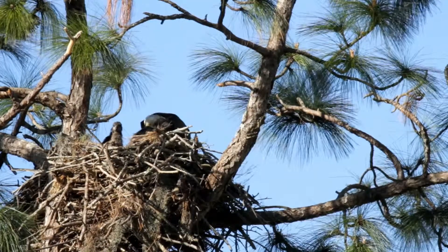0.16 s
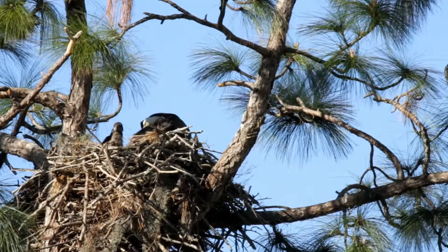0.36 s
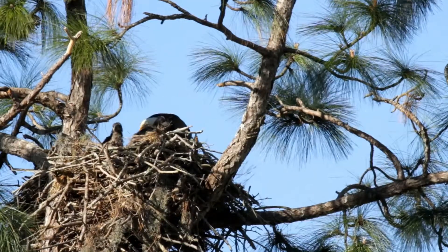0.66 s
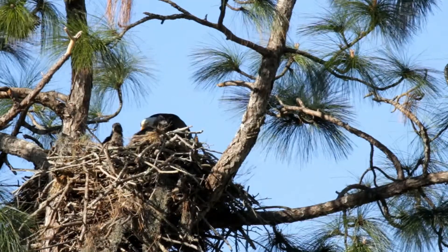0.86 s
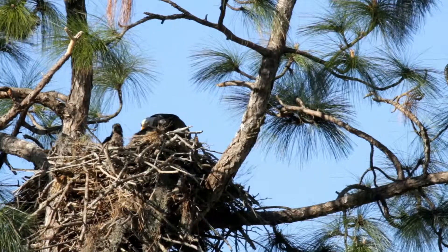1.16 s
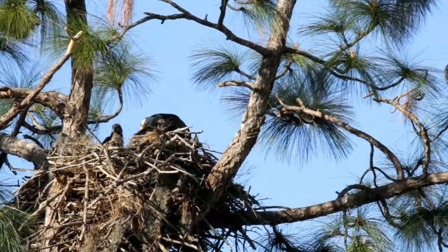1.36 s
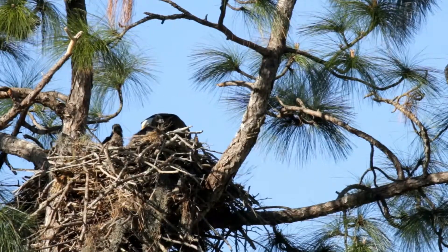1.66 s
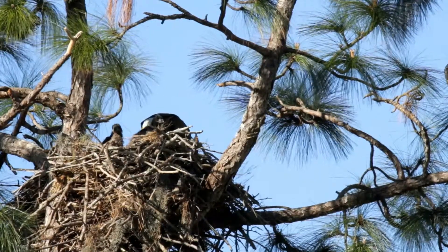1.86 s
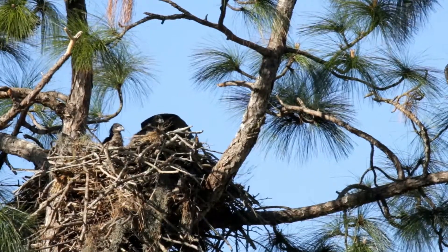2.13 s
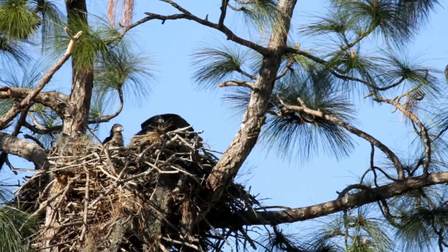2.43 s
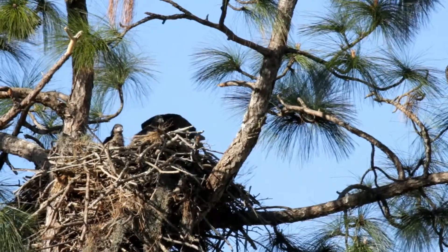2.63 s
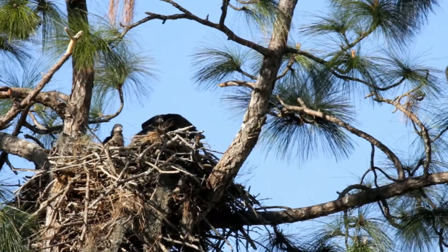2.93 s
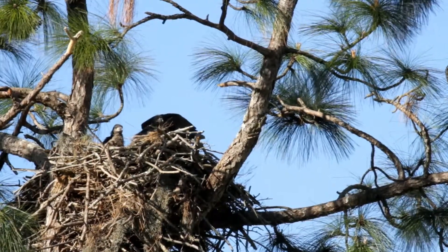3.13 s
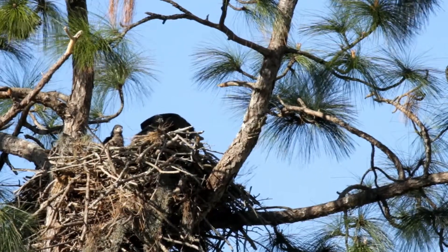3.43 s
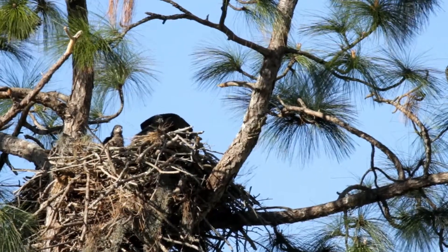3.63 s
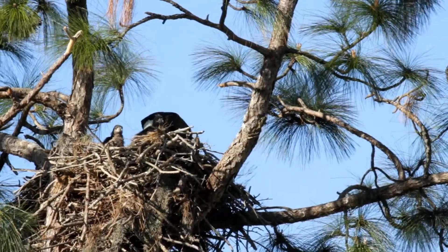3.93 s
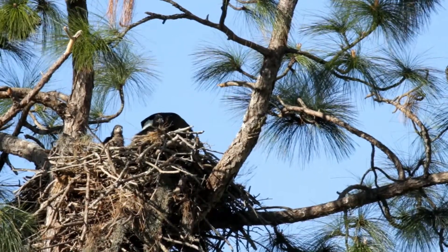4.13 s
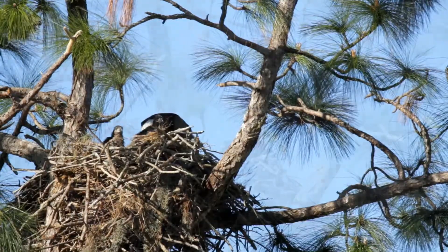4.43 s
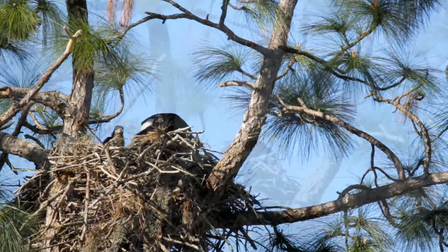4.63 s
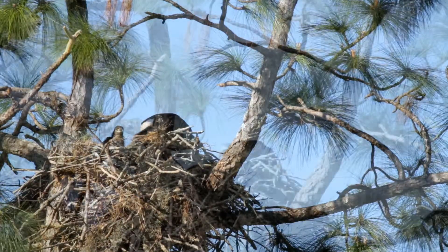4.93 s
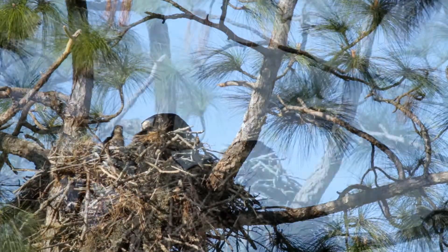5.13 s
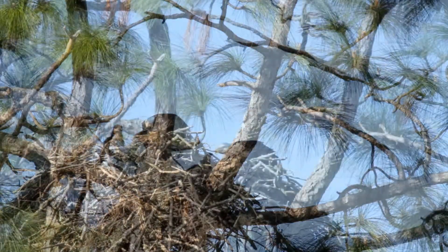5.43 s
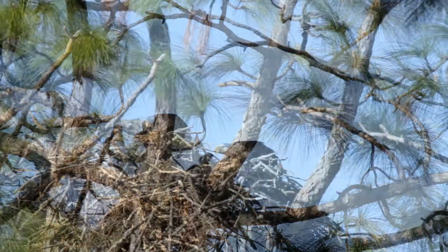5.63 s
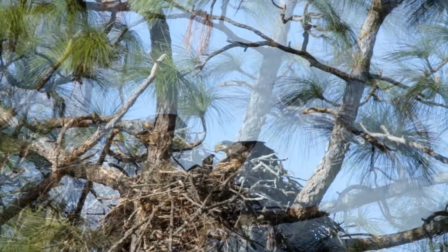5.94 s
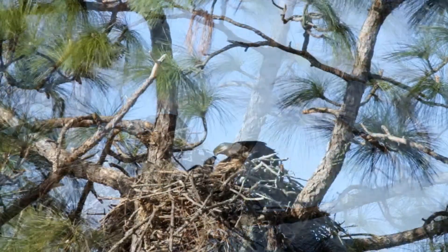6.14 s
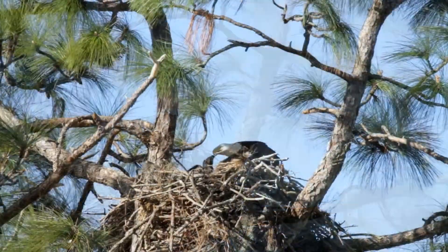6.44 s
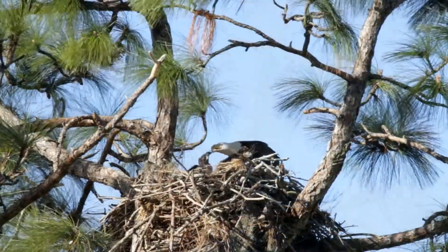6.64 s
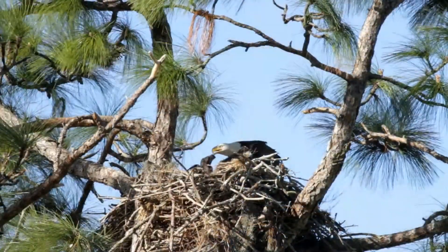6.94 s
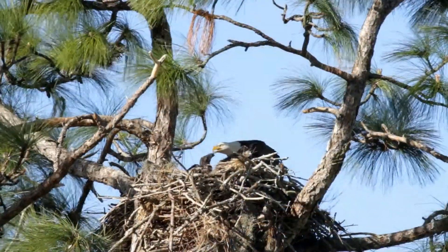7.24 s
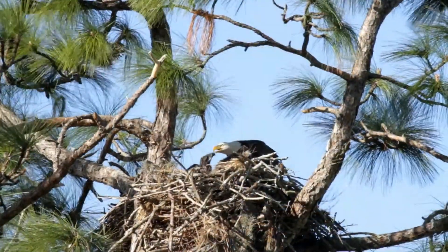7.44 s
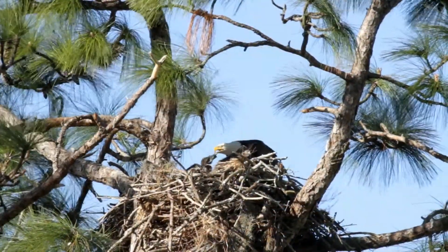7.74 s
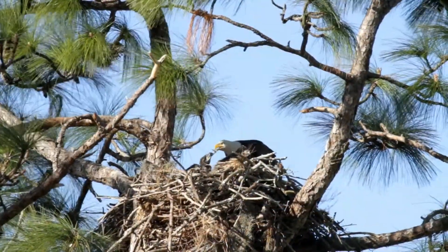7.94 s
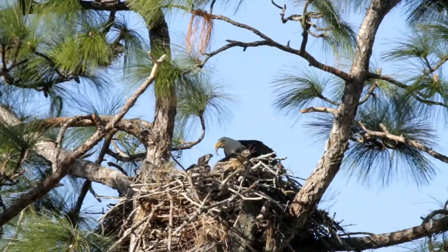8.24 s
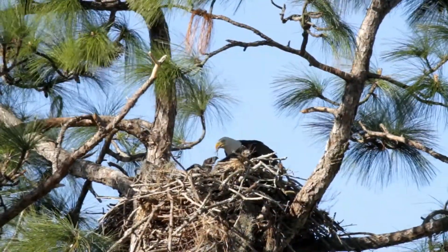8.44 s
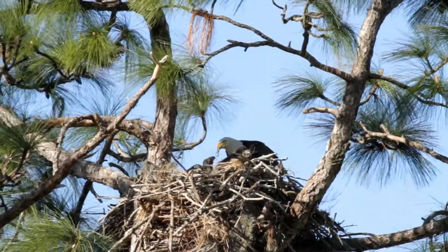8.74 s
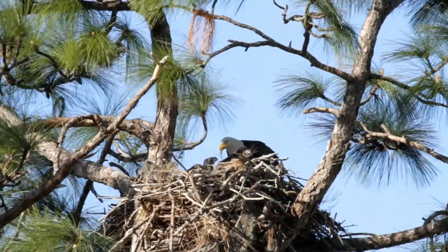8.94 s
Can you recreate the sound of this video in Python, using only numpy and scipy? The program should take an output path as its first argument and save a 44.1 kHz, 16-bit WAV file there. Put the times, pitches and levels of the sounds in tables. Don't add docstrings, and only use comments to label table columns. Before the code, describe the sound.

Raspy, fluttering begging breaths start at once, crowded with high chirps, squawks and brief pure whistles from eagles at their nest. After about five seconds the calls tire and gaps open. Trunks give a short, faint echo. Beneath are a deep machine hum that dies away, distant traffic with one nearer car late on, hissing needles and low gusts thumping an outdoor stereo microphone.

```python
import sys
import numpy as np
from scipy import signal
from scipy.fft import rfft, irfft, next_fast_len
from scipy.io import wavfile
from scipy.ndimage import uniform_filter1d

SR = 44100
rng = np.random.default_rng(int(sys.argv[2]) if len(sys.argv) > 2 else 0)


def how_loud(loudness_db):
    steps = np.asarray(loudness_db, float) / 20
    return 10 ** steps


def wrap_up_sound(samples):
    columns = np.atleast_2d(samples).T
    tamed = np.clip(columns, -1, 1)
    steps = np.round(tamed * 32767).astype(np.int16)
    wavfile.write(sys.argv[1], SR, steps)


N = 400869


def evened(x):
    return x / np.sqrt(np.mean(x ** 2) + 1e-20)


def read(points, hz):
    f, value = np.transpose(points)
    return np.interp(np.log(hz + 1), np.log(f + 1), value)


def curves(rows):
    s, *columns = np.transpose(rows)
    return [np.interp(np.arange(N) / SR, s, column) for column in columns]


def drift(size, span):
    smooth = uniform_filter1d(uniform_filter1d(rng.standard_normal(size), span), span)
    return smooth * np.sqrt(1.68 * span)


def noise(shape, same, patchy_db):
    frames, hz = N // 256 + 5, np.fft.rfftfreq(1024, 1 / SR)
    a, b, c, d, patches = rng.standard_normal((frames, 513, 5)).T
    patches = uniform_filter1d(patches, size=12, axis=0)
    patches = evened(uniform_filter1d(patches, size=14, axis=1))
    same = np.clip(same, -1, 1)
    left = a + 1j * b
    right = same * left + np.sqrt(1 - same ** 2) * (c + 1j * d)
    z = np.array([left, right])
    z *= how_loud(read(shape, hz)[:, None] + patchy_db * patches)
    return evened(signal.istft(z, nperseg=1024, noverlap=768)[1][:, :N])


def notes(rows, buzz, rough, overtone_db, soft, wobble=.015, size=90, fade_db=0, sweep=0):
    out, chance = np.zeros((2, N)), rng.random((len(rows), 3))
    fading = 1 + rough * (drift(N, size) + 1j * drift(N, size))
    warble = 1 + wobble * drift(N, span=400)
    for (s, length, first_hz, last_hz, db), (flutter, start, side) in zip(rows, chance):
        at = round((s - .003) * SR)
        t = np.arange(min(round((length + 0.0062) * SR), N - at)) / SR
        here = slice(at, at + len(t))
        beat = 2 * np.pi * ((81 + 4 * flutter) * t + .5 + .1 * start)
        hz = np.interp(t, [0, t[-1]], [first_hz, last_hz])
        hz *= 1 - sweep * np.sin(beat)
        turn = 2 * np.pi * np.cumsum(hz * warble[here]) / SR
        chop = (1 + buzz * np.cos(beat)) ** 2
        tone = (np.exp(1j * turn) + how_loud(overtone_db) * np.exp(2j * turn)) * fading[here]
        tone = tone.real * chop / np.sqrt((.5 + 2 * buzz ** 2) * (1 + 2 * rough ** 2))
        tone *= how_loud(db + fade_db * (t / t[-1] - .5))
        tone *= signal.windows.tukey(len(t), np.clip(soft, 0, 1))
        pan_db = 3 * (2 * side - 1) * np.array([[1], [-1]])
        out[:, here] += tone * how_loud(pan_db)
    return out


def glides(rows, share):
    return [(s, length, hz, share * hz, db) for s, length, hz, db in rows]


def begging():
    # start_s, length_s, effort_db, low_throat_db, beak_hiss_db
    breaths = [(-0.1, 0.18, -49, 10, -2.5), (0.106, 0.35, -47.5, 1, -7), (0.479, 0.16, -50.5, 2, -3.5),
               (0.67, 0.22, -58, 10, 2), (0.92, 0.2, -52, 7, -9), (1.115, 0.19, -54.5, 14, -1),
               (1.267, 0.19, -51, 7, -5), (1.483, 0.4, -49.5, -1, -7), (1.922, 0.11, -58.5, -5, -1),
               (2.013, 0.2, -46, -11, -7), (2.23, 0.12, -54.5, -8, -1), (2.414, 0.21, -51.5, -13, -5.5),
               (2.62, 0.18, -54, -1, -1), (2.808, 0.33, -52, 0.5, -5), (3.22, 0.3, -51, 3.5, -5),
               (3.598, 0.11, -52, -13, -11), (3.67, 0.15, -51, 4, -11), (3.908, 0.17, -51.5, 6.5, -4),
               (4.12, 0.21, -64, -8, -2), (4.265, 0.47, -46.5, -7, -12), (4.68, 0.28, -53, 4, -6.5),
               (4.97, 0.19, -53.5, 10, -5.5), (5.138, 0.17, -55.5, 8.5, -4),
               (5.36, 0.24, -51.5, 2, -6.5), (5.7, 0.2, -51, -2, -9.5), (6.0, 0.46, -53.5, -18, -7.5),
              (6.36, 0.24, -59, -13.5, -2), (6.74, 0.39, -59, -11, -4), (7.1, 0.17, -57.5, -1, -2.5),
              (7.27, 0.18, -54.5, 2, -10.5), (7.45, 0.16, -56, -1, -9), (7.58, 0.14, -66, -1.6, -1),
              (7.79, 0.18, -55.5, -2.5, -5.5), (8.02, 0.22, -52, -19, -10), (8.13, 0.19, -52, -19, -7.5),
              (8.4, 0.24, -54, -9, -8.5), (8.56, 0.24, -54.5, -2, -6.5), (8.85, 0.52, -52.5, -14, -7.5)]
    # start_s, effort_db
    murmur = [
        (0, -53.5),
        (1.4, -51),
        (2, -55),
        (3, -54.5),
        (5.5, -61),
        (7, -58.5),
        (7.7, -80),
        (9.1, -52.5),
    ]
    rise_share, fall_s = 0.35, 0.079
    murmur_bands_db = np.array([[0], [1.5], [-7.5]])
    power = how_loud(2 * curves(murmur)[0]) * how_loud(2 * murmur_bands_db)
    for s, length, db, low_db, beak_db in breaths:
        at = np.arange(max(round(s * SR), 0), min(round((s + length) * SR), N))
        u = (at / SR - s) / length
        opening = np.minimum(u / rise_share, (1 - u) * length / fall_s)
        breath = np.sin(np.pi / 2 * np.clip(opening, 0, 1)) ** 2
        power[:, at] += breath * how_loud(2 * (db + np.array([[0], [low_db], [beak_db]])))
    effort_db, low_db, beak_db = 10 * np.log10(power)
    return effort_db, low_db - effort_db, beak_db - effort_db


def rasps():
    # pitch_hz, level_db (per Hz)
    low_shape = [(1500, -41), (2300, -7), (2700, 3), (3200, -1), (3700, -55)]
    mid_shape = [(2600, -27), (3100, 2), (3350, 2.5), (3650, 1.5), (3900, 1), (4170, 1), (4420, -2),
                 (4700, -62)]
    beak_shape = [(4000, -32), (4700, 0), (5300, 1), (6200, 0), (7300, 1), (8300, -1.5), (9200, -8),
                  (16000, -20)]
    effort_db, low_db, hiss_db = begging()
    flutter_hz = 85 * (1 + 0.129 * drift(N, span=900))
    flutter = np.cos(2 * np.pi * np.cumsum(flutter_hz) / SR)
    low = noise(low_shape, same=0.59, patchy_db=2.5)
    low *= 1 + .3 * flutter
    throat = noise(mid_shape, same=0.41, patchy_db=1.5) + how_loud(low_db - 5.0) * low
    beak = how_loud(hiss_db + 1.5) * noise(beak_shape, same=0.2, patchy_db=3.5)
    return how_loud(effort_db) * (throat * (1 + .18 * flutter) + beak * (1 + .13 * flutter))


def buzzes():
    # start_s, length_s, first_pitch_hz, last_pitch_hz, level_db
    buzzy = [(0.09, 0.125, 2520, 2330, -48), (6.08, 0.13, 3150, 3150, -55), (6.3, 0.14, 3450, 3100, -55),
             (8.075, 0.11, 3850, 3600, -54), (0.131, 0.078, 3030, 2500, -51),
             (0.204, 0.112, 2800, 2620, -39.5), (0.489, 0.14, 2860, 2520, -42),
             (0.877, 0.044, 2820, 2590, -49), (1.14, 0.14, 3000, 2550, -51), (1.31, 0.26, 2960, 2480, -47),
             (1.606, 0.125, 3050, 2520, -46), (6.17, 0.2, 3700, 3600, -59), (4.39, 0.19, 3750, 3640, -50),
             (2.04, 0.089, 3750, 3650, -52.5), (3.772, 0.084, 2700, 2700, -46),
             (5.4, 0.09, 2900, 2950, -53.5), (3.831, 0.045, 2660, 2700, -57),
             (5.014, 0.058, 2640, 2700, -51), (8.045, 0.14, 3120, 3080, -52), (8.13, 0.03, 2780, 2700, -55),
             (8.6, 0.085, 4300, 3950, -54), (3.26, 0.12, 2700, 2530, -58), (2.9, 0.045, 2700, 2620, -52),
             (9.038, 0.062, 2890, 2890, -52)]
    return notes(buzzy, buzz=.9, rough=.12, overtone_db=-34, soft=.6, size=60, sweep=.025)


def chirps():
    # start_s, length_s, first_pitch_hz, last_pitch_hz, level_db
    slides = [(0.742, 0.023, 2770, 1860, -38), (0.803, 0.016, 2600, 2250, -46),
              (1.268, 0.022, 2100, 1100, -53), (1.565, 0.025, 2000, 1800, -51.5),
              (1.772, 0.014, 2950, 2350, -44), (3.338, 0.018, 2750, 2430, -48),
              (1.81, 0.025, 1300, 1280, -57), (1.86, 0.015, 2100, 1300, -55),
              (1.86, 0.083, 4780, 5400, -57), (1.937, 0.013, 3100, 2100, -50),
              (1.943, 0.041, 3840, 3400, -48), (2.709, 0.012, 1800, 2800, -52),
              (2.347, 0.005, 1700, 2600, -55), (2.686, 0.024, 2140, 1670, -49),
              (2.13, 0.015, 3100, 2300, -54), (2.128, 0.018, 3900, 3500, -46),
              (2.151, 0.018, 2750, 2480, -42), (3.342, 0.012, 4600, 4200, -54),
              (3.964, 0.012, 3900, 3500, -50), (2.952, 0.056, 2120, 1630, -52),
              (3.108, 0.007, 1250, 2900, -52), (3.51, 0.007, 2700, 1950, -52),
              (3.455, 0.035, 2000, 1600, -52), (3.63, 0.0187, 4750, 3500, -51),
              (3.649, 0.012, 3300, 1850, -44.5), (3.893, 0.032, 4050, 4700, -55),
              (3.947, 0.016, 5000, 4200, -55), (4.012, 0.036, 2810, 1400, -48),
              (4.257, 0.024, 2650, 1950, -48), (4.528, 0.036, 7400, 6560, -57),
              (4.859, 0.017, 4150, 3300, -50), (4.878, 0.02, 2900, 1400, -48),
              (6.093, 0.008, 2150, 2950, -55), (6.13, 0.022, 3350, 2300, -54),
              (6.984, 0.022, 4000, 3500, -46.5), (7.008, 0.015, 3700, 2400, -49),
              (4.958, 0.045, 2770, 2520, -45), (7.845, 0.012, 2300, 3600, -56),
              (7.872, 0.0102, 3200, 2250, -50), (7.862, 0.01, 4200, 3500, -55)]
    # start_s, length_s, first_pitch_hz, level_db
    chips = [(0.03, 0.024, 4380, -48), (0.722, 0.025, 4000, -56), (1.837, 0.031, 2730, -45.5),
             (0.392, 0.011, 2700, -52), (0.362, 0.008, 2700, -50), (0.775, 0.017, 2600, -49),
             (2.1, 0.011, 3270, -63), (2.6, 0.01, 2550, -51), (2.323, 0.017, 2650, -53),
             (2.716, 0.016, 1810, -51), (2.725, 0.024, 2960, -49), (3.172, 0.014, 4090, -50),
             (3.53, 0.0089, 2850, -51), (3.702, 0.018, 2750, -55), (4.776, 0.012, 3800, -55),
             (3.934, 0.0094, 3070, -43.5), (3.924, 0.012, 6500, -61), (4.471, 0.016, 3300, -47),
             (4.562, 0.026, 2600, -58), (4.642, 0.024, 3300, -47), (4.6, 0.012, 4050, -50),
             (4.595, 0.019, 2200, -56), (5.548, 0.021, 2840, -51), (5.86, 0.015, 3350, -50),
             (6.1, 0.02, 2150, -57), (7.625, 0.02, 3600, -57), (8.353, 0.0072, 2900, -55),
             (8.945, 0.0093, 2980, -52)]
    falling = np.vstack([slides, glides(chips, share=.72)])
    clear = notes(falling, buzz=0, rough=.15, overtone_db=-25, soft=.4, fade_db=-4)
    edge = notes(slides, buzz=0, rough=3, overtone_db=-25, soft=.3, size=18)
    return clear + how_loud(-10) * edge


def whistles():
    # start_s, length_s, pitch_hz, level_db
    held = [(0.352, 0.04, 2800, -45.5), (0.102, 0.014, 4400, -53), (0.128, 0.014, 4250, -54),
            (2.062, 0.04, 3100, -44.5), (0.689, 0.018, 2680, -40), (0.714, 0.022, 2670, -36.5),
            (0.706, 0.025, 3800, -49), (0.7, 0.038, 1685, -48.5), (0.793, 0.028, 4230, -48),
            (0.865, 0.032, 4220, -50), (0.962, 0.032, 2800, -55), (1.019, 0.051, 2585, -37),
            (1.142, 0.027, 4150, -49), (1.158, 0.027, 3780, -47), (1.609, 0.054, 4720, -59),
            (1.682, 0.053, 5000, -60), (1.756, 0.11, 4850, -59), (1.975, 0.028, 2700, -50.5),
            (2.09, 0.025, 4870, -52), (2.316, 0.008, 2700, -45), (2.351, 0.013, 2720, -45.5),
            (2.354, 0.018, 1336, -55), (3.676, 0.016, 3720, -54), (3.752, 0.03, 3780, -48),
            (3.942, 0.015, 1305, -53), (4.004, 0.025, 3550, -47), (4.41, 0.008, 2730, -47.5),
            (4.42, 0.008, 2480, -49), (4.558, 0.014, 2750, -46), (4.574, 0.021, 2770, -40),
            (4.792, 0.012, 2630, -50), (4.665, 0.02, 2520, -49), (4.75, 0.026, 5100, -55),
            (5.079, 0.019, 2410, -43), (7.514, 0.01, 3720, -54), (7.611, 0.01, 3720, -52.5),
            (7.897, 0.0073, 3950, -53), (8.215, 0.012, 3800, -53), (9.04, 0.045, 2890, -51),
            (6.152, 0.014, 2290, -52.5), (1.753, 0.012, 2680, -45), (2.88, 0.012, 3680, -51),
            (3.728, 0.022, 1950, -53)]
    return notes(glides(held, share=.97), buzz=.05, rough=.15, overtone_db=-30, soft=.5)


def squawks():
    # start_s, length_s, first_pitch_hz, last_pitch_hz, level_db
    hoarse = [(0.004, 0.11, 2600, 2450, -48), (0.17, 0.06, 2500, 2850, -46), (1.71, 0.08, 2850, 2650, -49),
              (0.69, 0.05, 2150, 2080, -48), (0.75, 0.052, 2500, 2050, -55), (1.26, 0.035, 2100, 1600, -56),
              (1.56, 0.04, 1900, 1850, -56), (1.775, 0.043, 1900, 1640, -54), (2.1, 0.045, 3000, 2760, -51),
              (6.55, 0.04, 2200, 1800, -53), (2.32, 0.058, 2350, 2260, -60),
              (2.505, 0.087, 2950, 2820, -52), (2.68, 0.11, 2100, 2375, -56),
              (3.104, 0.032, 2550, 2480, -48.5), (3.72, 0.04, 2000, 1860, -55),
              (3.955, 0.07, 3800, 3230, -50), (4.595, 0.04, 2650, 2550, -49.5),
              (5.01, 0.13, 2800, 2490, -51), (7.08, 0.025, 2300, 2100, -54), (7.2, 0.028, 2700, 2300, -51),
              (8.66, 0.1, 2900, 2880, -59), (2.7, 0.08, 5100, 4900, -56), (2.91, 0.045, 5300, 4700, -55),
              (3.11, 0.07, 5100, 5000, -58), (3.37, 0.11, 5300, 5200, -57), (4.05, 0.1, 5000, 4900, -58),
              (0.19, 0.12, 7300, 7200, -54), (0.5, 0.12, 7300, 7100, -53), (3.7, 0.14, 7500, 7300, -56),
              (0.7, 0.035, 3900, 3900, -54), (0.77, 0.05, 1900, 1800, -53), (3.63, 0.035, 4300, 2800, -54),
              (4.01, 0.04, 2600, 1600, -54), (5.6, 0.1, 2600, 2500, -59), (5.94, 0.1, 4200, 4100, -58)]
    return notes(hoarse, buzz=.3, rough=3, overtone_db=-25, soft=.5, size=22)


def spits():
    # start_s, length_s, level_db
    bursts = [(0.19, 0.12, -56), (0.495, 0.12, -58), (0.95, 0.077, -65), (1.18, 0.08, -65),
              (1.32, 0.08, -57), (1.65, 0.12, -64), (2.06, 0.1, -63), (2.28, 0.06, -69), (2.68, 0.08, -71),
              (3.368, 0.12, -55), (3.61, 0.05, -67), (3.69, 0.13, -73), (3.933, 0.12, -60),
              (4.4, 0.25, -69), (4.78, 0.14, -64), (5.2, 0.063, -73), (5.45, 0.14, -67), (5.77, 0.09, -67),
              (6.8, 0.13, -66), (7.85, 0.089, -67), (8.095, 0.18, -64), (8.45, 0.28, -73)]
    # pitch_hz, level_db (per Hz)
    air_shape = [(4300, -40), (5200, -9), (7500, -1), (9000, -2), (13000, -5.5), (16000, -28)]
    edge_s = 0.017
    t, gate = np.arange(N) / SR, np.zeros(N)
    for s, length, db in bursts:
        gate += how_loud(db) * np.clip(np.minimum(t - s, s + length - t) / edge_s, 0, 1)
    return gate * noise(air_shape, same=0.27, patchy_db=5.0)


def chatter(count=260):
    s, length, pitch, fall, strength = rng.random((count, 5)).T
    s = .01 + s * (N / SR - .06)
    first_hz = 3100 * 2.9 ** (pitch ** 1.6)
    last_hz = first_hz * (.92 - .25 * fall)
    effort_db = begging()[0][(s * SR).astype(int)]
    db = effort_db - 6 - 7 * strength - 8 * np.log2(first_hz / 2600)
    rows = np.transpose([s, .012 + .025 * length, first_hz, last_hz, db])
    return notes(rows, buzz=0, rough=.15, overtone_db=-25, soft=.4, fade_db=-4)


def peeps():
    # start_s, length_s, pitch_hz, level_db
    thin = [(0.65, 0.11, 6580, -59), (0.707, 0.044, 7460, -54), (0.781, 0.02, 8670, -55),
            (0.884, 0.035, 8100, -58), (1.734, 0.041, 7200, -56), (6.09, 0.29, 4170, -53),
            (1.943, 0.036, 7400, -58), (2.123, 0.028, 7660, -48), (3.477, 0.018, 6770, -54),
            (3.747, 0.049, 7660, -57), (3.976, 0.032, 6290, -57), (4.745, 0.021, 6680, -56),
            (5.04, 0.036, 7440, -59), (5.751, 0.087, 6080, -64), (6.168, 0.036, 9680, -63),
            (6.169, 0.046, 6300, -62), (6.269, 0.1074, 6750, -63.5), (6.377, 0.048, 9170, -69),
            (6.674, 0.22, 5380, -62), (6.824, 0.035, 9930, -57), (6.825, 0.18, 5400, -58.5),
            (6.88, 0.036, 6370, -54), (6.978, 0.046, 6070, -63), (7.06, 0.053, 9430, -55)]
    return notes(glides(thin, share=.995), buzz=0, rough=.7, overtone_db=-40, soft=.6, wobble=.007)


def woods(x, t60=0.23):
    taps = np.zeros((2, SR // 2))
    at = np.arange(300, SR // 2 - 20, 20) + rng.integers(0, 20, (2, (SR // 2 - 301) // 20))
    np.put_along_axis(taps, at, rng.choice([-1., 1.], at.shape), 1)
    taps *= how_loud(-60 * np.arange(SR // 2) / SR / t60)
    taps /= np.linalg.norm(taps[0])
    return signal.fftconvolve(x.mean(0)[None], taps, axes=1)[:, :N]


def machine():
    # start_s, hum_db, second_shaft_db
    levels = [
        (0.0, -43.5, -58.5),
        (0.86, -41.5, -54),
        (0.98, -42, -60.5),
        (4.44, -39.5, -48.5),
        (5.25, -45.5, -55),
        (6.8, -54, -57),
        (6.9, -67, -62),
    ]
    hum_hz, shaft_hz = 67.43, 97.85
    out, t = np.zeros((2, N)), np.arange(N) / SR
    fade = np.clip((7.1 - t) / 0.79, 0, 1)
    hum_db, shaft_db = curves(levels)
    lines = ((hum_hz, hum_db), (shaft_hz, shaft_db),
             (4 * hum_hz, hum_db - 26.5), (3 * shaft_hz, shaft_db - 16.5))
    for hz, db in lines:
        turn = 2 * np.pi * np.cumsum(hz + .3 * drift(N, span=12000)) / SR
        level = np.sqrt(2) * how_loud(db + 0.95 * drift(N, span=3000))
        out += level * np.sin(turn + np.array([[-.6], [.6]]))
    return out * fade


def outdoors():
    # start_s, gusts_db, traffic_db
    levels = [(0.0, -60.5, -55), (2.2, -53.5, -55), (2.53, -59.5, -56), (2.68, -49.5, -54),
              (3.37, -58, -54), (3.75, -51, -52.5), (5.44, -59, -54), (5.9, -49, -53), (6.4, -56, -51.5),
              (6.5, -47, -50), (6.94, -52, -49), (7.69, -54.5, -52), (9.09, -53, -50.5)]
    # pitch_hz, level_db (per Hz)
    gust_shape = [(20, -33), (45, -8), (90, 7.5), (160, 1), (260, -13.5), (420, -29.5), (2000, -83)]
    road_shape = [(150, -5.5), (330, -4), (700, 3), (1300, -4.5), (2200, -9), (4000, -20.5), (7000, -50),
                  (14000, -80)]
    car_shape = [(500, -30), (1000, 4), (1500, 2), (2300, -5), (3500, -28)]
    leaf_shape = [(1500, -27), (3000, 5), (8500, -11), (16000, -15.5)]
    pass_s, span_s, pass_db, leaf_db = 7.45, 0.35, -53.5, -61
    gust_db, road_db = curves(levels)
    gust_db = gust_db + 8.5 + 0.5 * drift(N, span=3000)
    gusts = how_loud(gust_db) * noise(gust_shape, same=0.009, patchy_db=1.5)
    road = how_loud(road_db + 0.5) * noise(road_shape, same=0.71, patchy_db=0.88)
    near_db = pass_db - 10 * np.log10(1 + ((np.arange(N) / SR - pass_s) / span_s) ** 4)
    road += how_loud(near_db) * noise(car_shape, same=0.8, patchy_db=2.0)
    leaves = how_loud(leaf_db) * noise(leaf_shape, same=.55, patchy_db=2.5)
    return gusts + road + leaves


def scene():
    calls = buzzes() + chirps() + whistles() + squawks() + chatter() + peeps()
    calls += how_loud(-8) * woods(calls)
    return calls + rasps() + spits() + machine() + outdoors()


def roll_off(x):
    return signal.sosfilt(signal.butter(12, 15800, fs=SR, output="sos"), x)


def record(dry):
    # pitch_hz, left_minus_right_db
    balance = [(60, -5.5), (700, -7.5), (2400, -1), (4400, 5.5), (8100, 5), (15000, 1)]
    # pitch_hz, left_lead_radians
    phase = [(0, 0), (2600, .7), (3450, 3.1), (3700, 7.2), (4480, 9.6), (5200, 12.6), (6900, 25.2),
             (7600, 27.3), (15500, 31)]
    size = next_fast_len(N + 2048)
    hz = np.fft.rfftfreq(size, 1 / SR)
    lead = np.interp(hz, *np.transpose(phase))
    half = how_loud(read(balance, hz) / 2) * np.exp(.5j * lead)
    ports = irfft(rfft(dry, size) * np.array([half, 1 / half]), size)[:, :N]
    return roll_off(ports)


dry = scene()
out = record(dry)
wrap_up_sound(out)
```